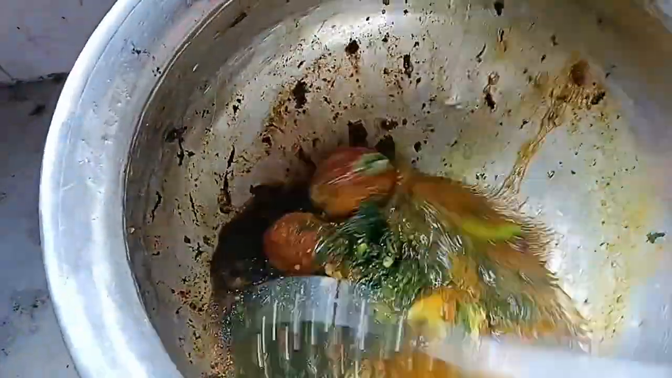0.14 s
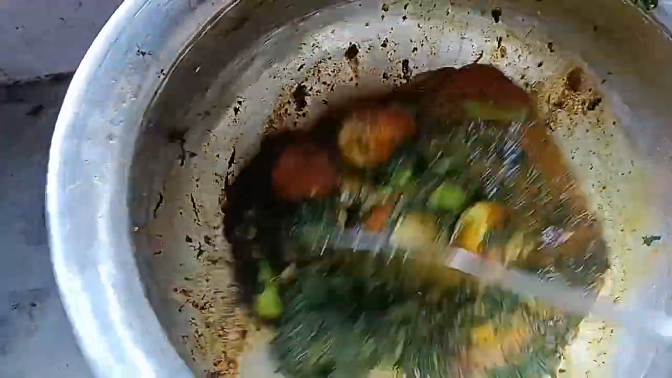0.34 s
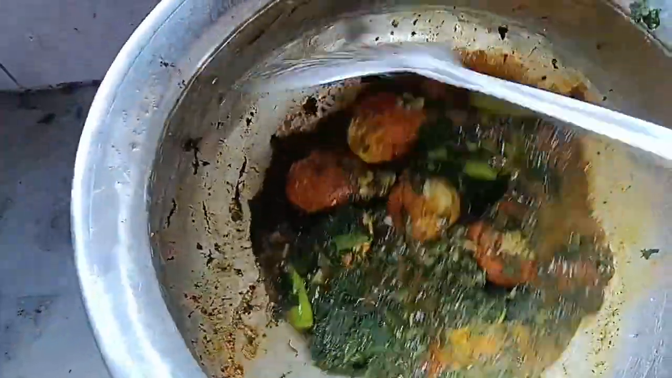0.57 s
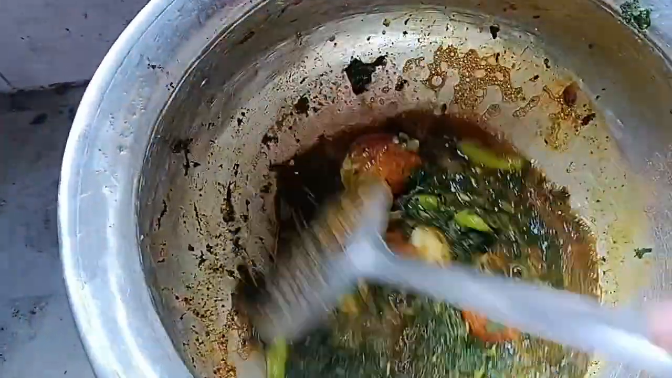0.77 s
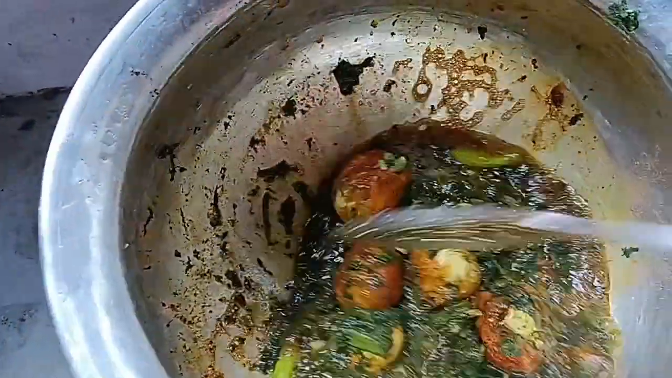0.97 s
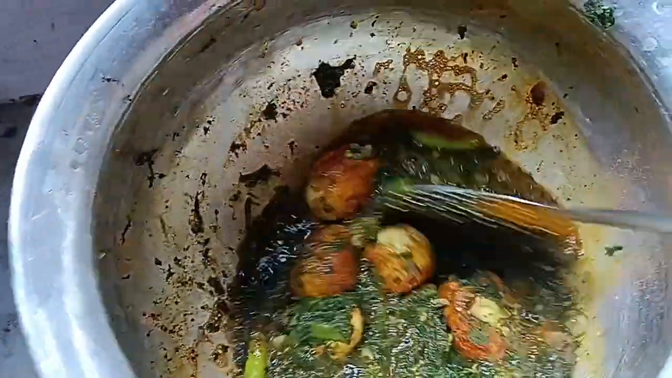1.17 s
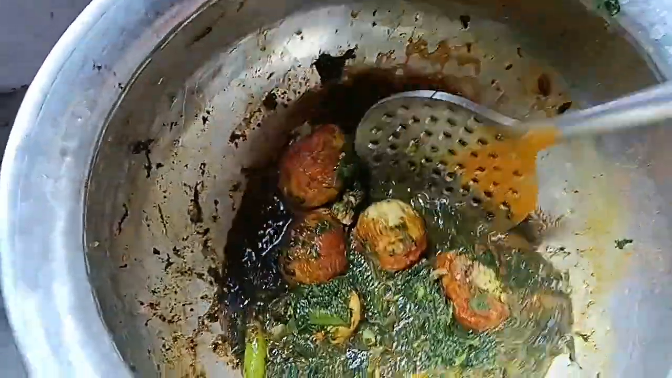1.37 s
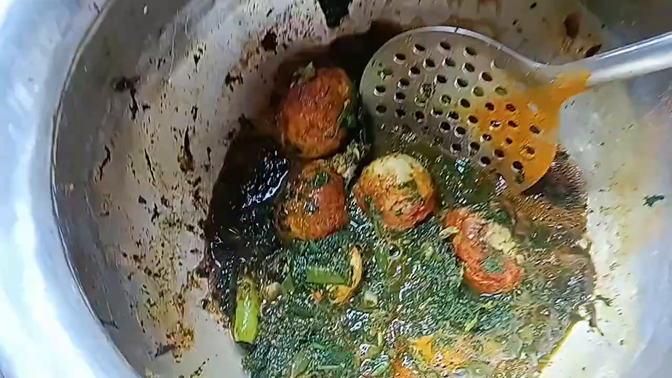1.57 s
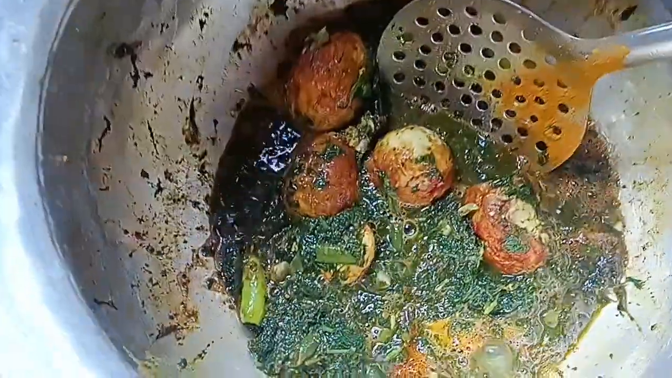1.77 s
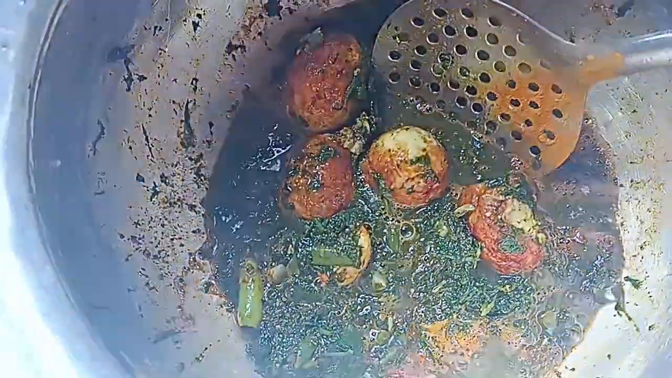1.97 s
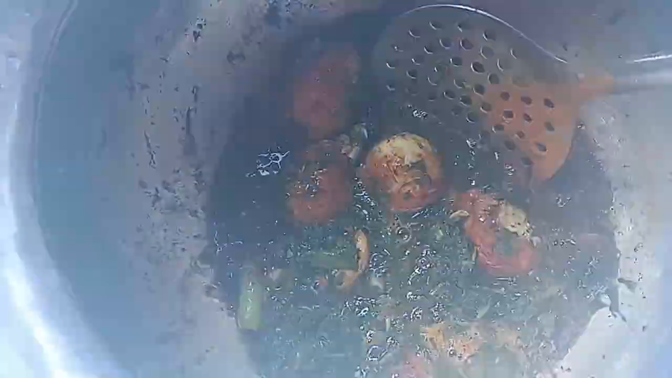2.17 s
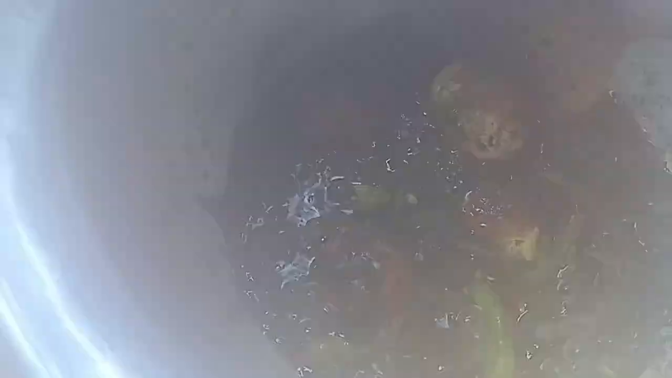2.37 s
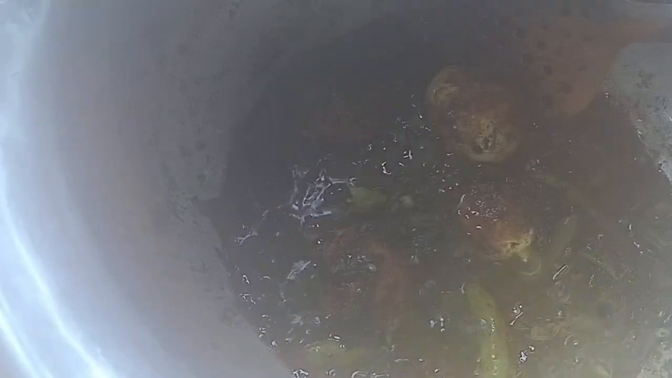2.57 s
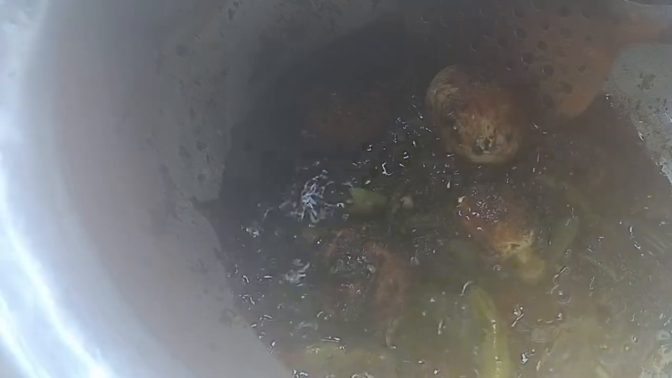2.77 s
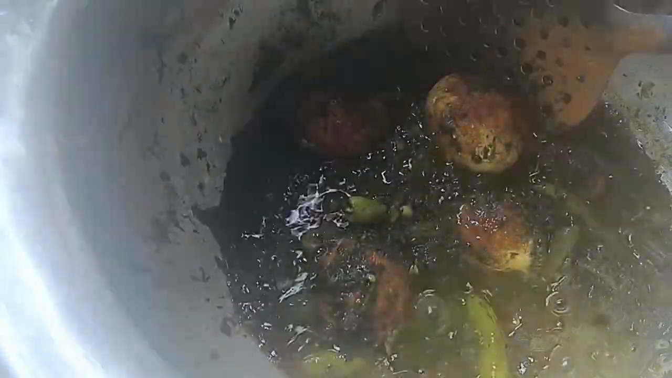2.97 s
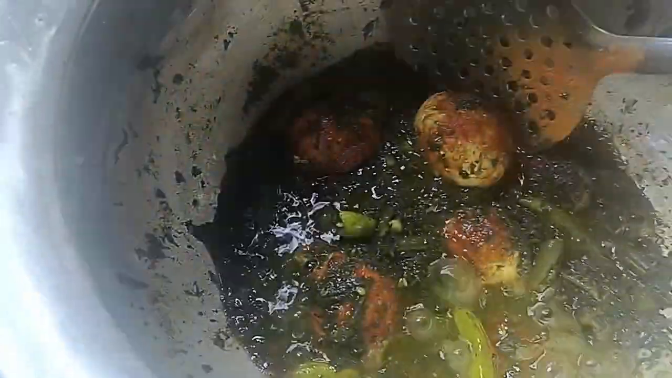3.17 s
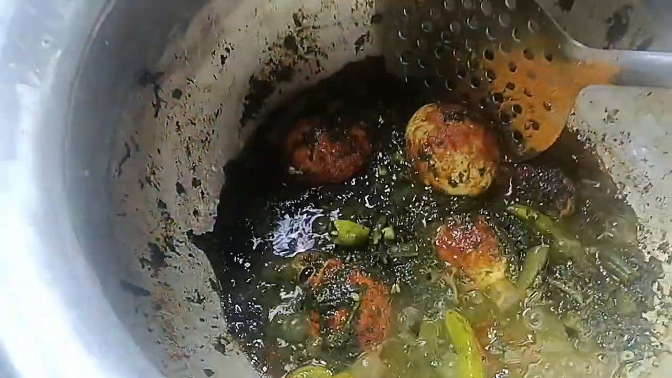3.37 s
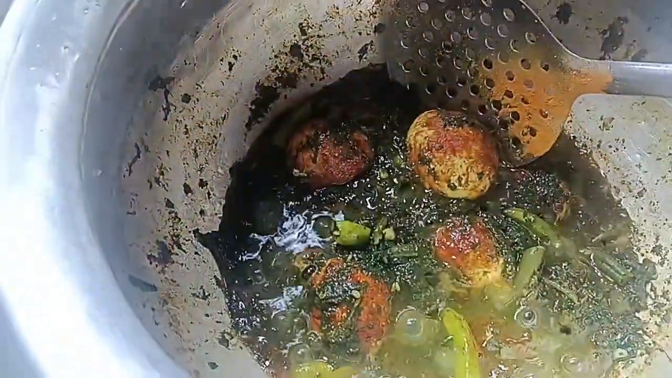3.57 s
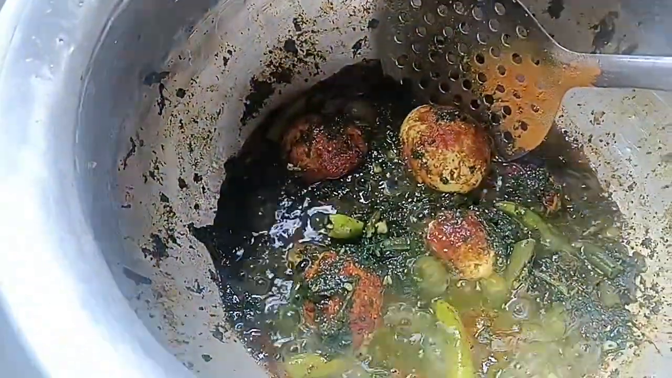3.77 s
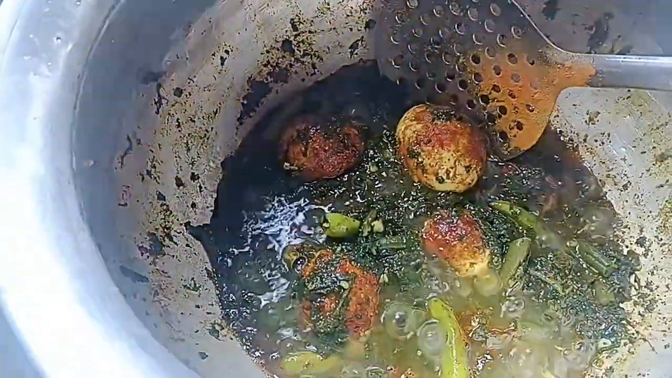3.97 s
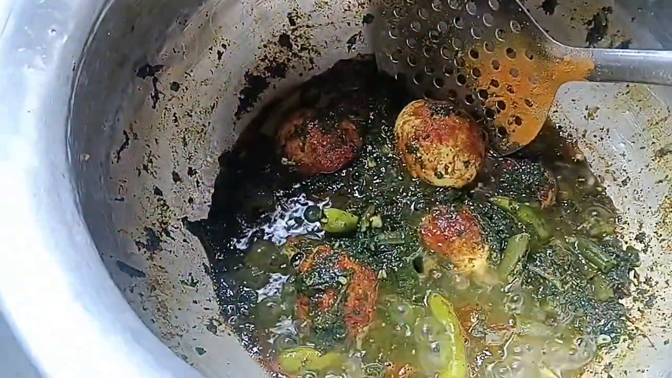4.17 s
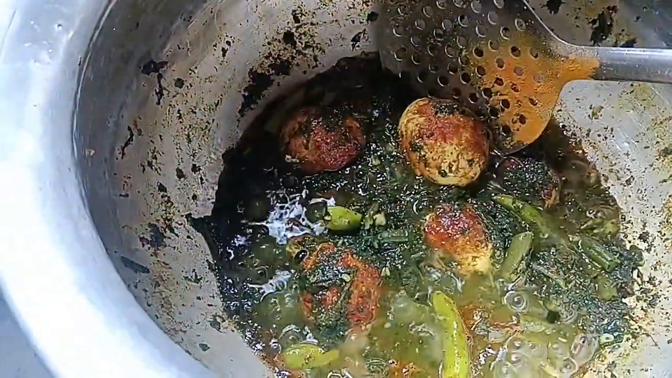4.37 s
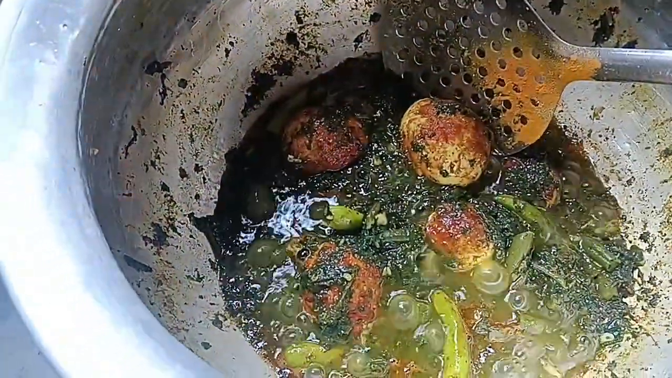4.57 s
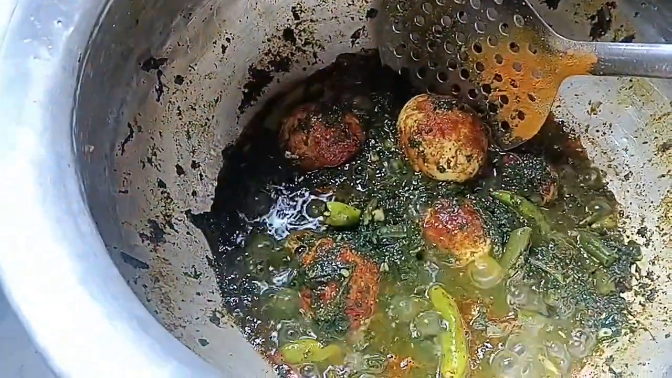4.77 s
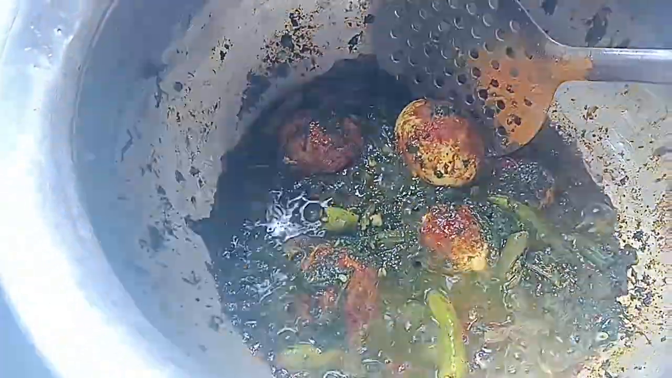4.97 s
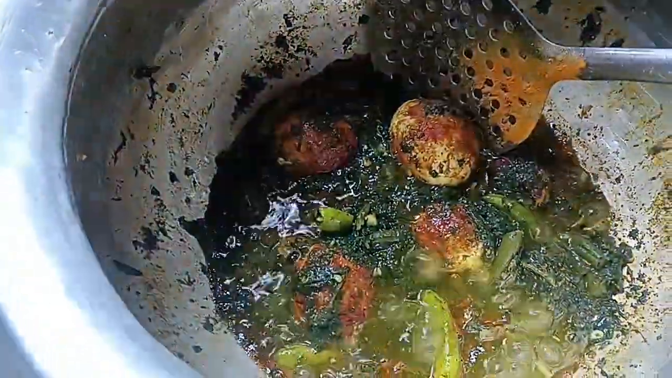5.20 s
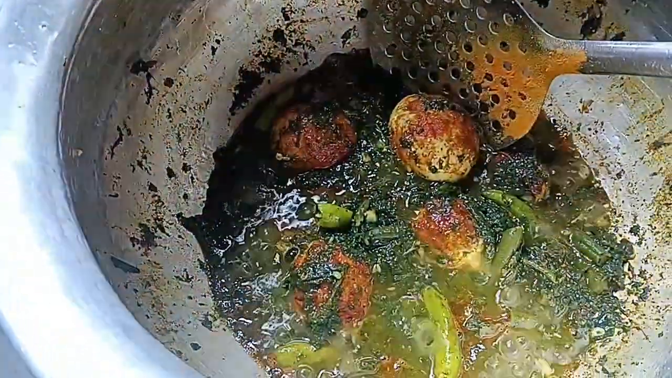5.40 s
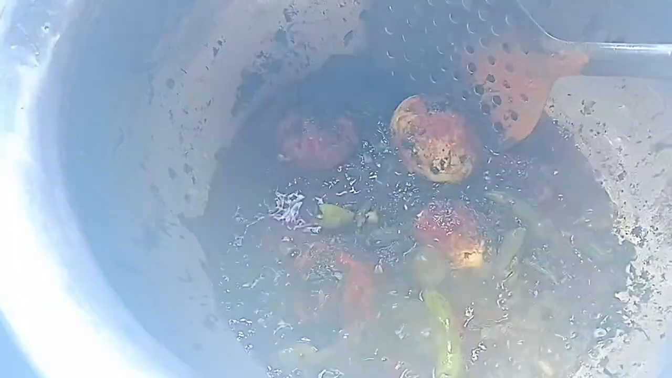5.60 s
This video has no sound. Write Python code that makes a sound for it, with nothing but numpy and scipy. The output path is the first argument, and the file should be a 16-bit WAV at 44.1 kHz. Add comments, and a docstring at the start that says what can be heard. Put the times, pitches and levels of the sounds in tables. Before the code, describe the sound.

Close up in a kitchen, a slotted steel spoon knocks a wide aluminium pot, with a few uneven clanks in the first second and a half, while greens and eggs sizzle softly. Frying and spits grow, the sound cuts to silence for a tenth of a second, then thin gravy boils strongly with hiss, plops and tiny steam squeaks, settling slightly to a steady boil.

```python
"""In a kitchen, a slotted steel spoon knocks around a wide aluminium pot of greens and eggs and is laid on its wall.
Blows are decaying modes of pot, spoon and enclosed air, with shaped noise for the crowded upper modes.
The food fries and spits; after a cut and a short muted gap, thin gravy boils strongly and settles.
Bubbles and sizzle are showers of damped sines, with hiss; bursts and spits excite the pot's air resonances.
Steam squeaks are gliding tones; low filtered noise is the burner's rumble."""
import sys
import numpy as np
from scipy import signal
from scipy.fft import rfft, irfft, next_fast_len
from scipy.io import wavfile
from scipy.ndimage import map_coordinates

SR = 44100
rng = np.random.default_rng(int(sys.argv[2]) if len(sys.argv) > 2 else 0)


def master(y):
    """Save y as 16-bit WAV."""
    cut = np.clip(np.atleast_2d(y).T, -1, 1)
    pcm = np.round(cut * 32767)  # scale
    wavfile.write(sys.argv[1], SR, pcm.astype(np.int16))


N = 248724

# resonances of the air in the pot: f/Hz, relative level/dB, t60/s
HOLLOW = [(363.6, -8, 0.15), (401.5, 0, 0.083), (442.5, -11, 0.15), (591.8, -9, 0.11), (981.8, -3.5, 0.12),
          (1008.4, -2, 0.067), (1526, -10.5, 0.14), (1829, -14.5, 0.11), (2690, -22, 0.12)]
BOIL_START_S, SETTLE_S = 2.46, 0.61  # cut to the strongly boiling gravy; time constant of its settling


def spoon_blows():
    """Modal excitation: the place of a blow sets how strongly each pot mode rings; spoon and air answer too."""
    # modes of the pot's metal: f/Hz, t60/s, then relative level/dB when struck on the side, base, wall, rim
    pot_modes = [(225, 1.1, -46, -54, -39, -49), (456, 0.6, -48, -43, -40, -54),
                 (495, 0.4, -56, -61, -35, -59), (689, 0.3, -64, -50, -35, -40),
                 (1022, 0.3, -54, -39, -35, -41), (1200, 1.5, -79, -63, -58, -47),
                 (1287, 0.9, -47, -57, -44, -56), (1384, 1.0, -63, -76, -41, -52),
                 (1522, 0.5, -56, -49, -26, -34), (1609, 0.42, -52, -41, -30, -25),
                 (1663, 0.85, -50, -42, -39, -41), (1711, 0.85, -63, -62, -41, -35),
                 (1729, 0.9, -71, -51, -42, -39), (1906, 0.7, -52, -81, -56, -69),
                 (2157, 0.9, -68, -67, -64, -41), (2239, 0.5, -45, -50, -40, -42),
                 (2317, 0.6, -50, -66, -52, -32), (2331, 0.7, -38, -55, -48, -39),
                 (2444, 0.5, -44, -55, -46, -45), (2476, 0.45, -45, -51, -51, -34),
                 (2530, 0.6, -39, -60, -52, -46), (2657, 0.35, -51, -53, -54, -38),
                 (3149, 0.43, -53, -54, -51, -37), (3400, 0.28, -56, -44, -41, -31),
                 (3521, 0.3, -62, -47, -36, -31), (3732, 0.25, -62, -55, -46, -25),
                 (3806, 0.33, -74, -54, -41, -30), (3880, 0.33, -64, -51, -45, -30),
                 (4070, 0.25, -74, -57, -42, -35), (4215, 0.27, -65, -50, -54, -31)]
    # places struck, in the order of those level columns
    places = ["side", "base", "wall", "rim"]
    # modes of the hand-damped spoon: f/Hz, relative level/dB, t60/s
    spoon_modes = [(2590, 8, 0.068), (2870, -8, 0.092), (3240, 13.5, 0.04), (3760, -4.5, 0.071),
                   (4350, -9.5, 0.065), (4780, 6, 0.044), (5390, -2, 0.04), (5860, 2, 0.11),
                   (7050, -22, .06), (7430, 2.5, 0.092)]
    # spoon on pot: t/s, place, relative level/dB of pot ring, spoon, hollow thud, sharp crack, clash,
    # then the clash's bass boost/dB and tilt/(dB per octave)
    blows = [(0.000, "side", 0, -66, -52, -27, -45.5, -2, -1.5),
             (0.2247, "side", -22.5, -66, -66, 8, -49.5, -28, -1),
             (0.231, "side", -22.5, -49.5, -49, 15.5, -44, -15, 0),
             (0.24, "base", -14.5, -64, -49, 13, -44.5, -13, 2.5),
             (0.268, "base", -30, -73, -51.5, 10, -53.5, 9, 0),
             (0.7204, "base", -6.5, -39.5, -48, 15, -36, -7, 6),
             (0.7275, "rim", -12.5, -36.5, -55, 3, -42.5, -19.5, 2),
             (0.783, "base", -5.5, -34, -25.5, -1.5, -22, 5, 2.5),
             (0.797, "base", -10.5, -39.5, -23.5, -1, -42.5, 5.5, 1),
             (1.2011, "wall", 0.5, -34, -31.5, 12.5, -18, -2.5, 1),
             (1.4905, "rim", -0.5, -33.5, -57, 5, -17.5, -27.5, -1)]
    out = np.zeros(N)
    for s, place, pot_db, spoon_db, thud_db, crack_db, clash_db, bass_db, tilt_db in blows:
        column = places.index(place)
        pot = [(hz, levels[column], t60) for hz, t60, *levels in pot_modes]
        # an out-of-round pot splits each mode into a beating pair
        twins = [(hz + 12 * rng.standard_normal(), db - 6.5, t60) for hz, db, t60 in pot]
        add(out, s, amp(pot_db) * ring(pot + twins, scatter_db=-0.7))
        add(out, s, amp(spoon_db) * ring(spoon_modes, scatter_db=3.5, size=SR // 4))
        add(out, s, amp(thud_db) * ring(HOLLOW[:3], scatter_db=-6.0, size=SR // 2))
        add(out, s, amp(clash_db + 2.5) * clash(bass_db, tilt_db, crack_db, crack_t60=0.026))
    return out


def clash(bass_db, tilt_db, crack_db, crack_t60):
    """High modal density: the crowded upper modes of both metals crack, then linger as a wash in pot and kitchen."""
    # spectrum of the clash: f/Hz, relative level/dB
    clash_colour = [(40, -22.5), (150, -7.5), (480, -1.5), (630, -0.5), (800, 4.5), (1250, -4), (1650, 5),
                    (1950, 2), (2400, 2), (2850, -4), (3300, 6), (4600, -3), (5050, -7), (7300, -3.5),
                    (9000, -1.5), (16000, -9)]
    # decay of the wash: f/Hz, t60/s
    clash_decay = [(150, 0.75), (1000, 0.34), (3500, 0.26), (7000, 0.24), (14000, 0.17)]
    # steel striking aluminium: f/Hz, relative level/dB
    contact = [(150, 0), (400, 3.5), (900, 1), (2000, -10), (4200, 0), (6500, -2.5), (12000, -20)]
    tilt_pivot_hz, bass_below_hz = 3570, 727

    # the modes bunch unevenly along frequency
    clusters = np.clip(wobble(226.4, size=SR // 2 + 1), -1.5, 1.5)
    modes = unit(irfft(rfft(rng.standard_normal(SR)) * amp(2.8 * clusters), SR))
    hz, t, bands = signal.stft(modes, SR, nperseg=256)
    lingering = fade(t, along(clash_decay, hz)[:, None])
    crack = amp(crack_db) * fade(t, crack_t60)
    wash = signal.istft(bands * (lingering + crack), SR, nperseg=256)[1][:SR]

    def response(f):
        """Contact stiffness: a harder contact tilts the clash upward; a square, heavy one adds bass."""
        bass = bass_db / (1 + (f / bass_below_hz) ** 6)
        tilt = tilt_db * np.log2(np.maximum(f, bass_below_hz) / tilt_pivot_hz)
        return amp(along(contact, f) + along(clash_colour, f) + bass + tilt)

    return filtered(wash, response) * (1 - np.exp(-np.arange(SR) / SR / 0.00017))


def bubbling():
    """Bubble resonance: bursts excite the air in the pot, and slower plops ring in the liquid."""
    # spectrum of the plops in the broth: f/Hz, relative level/(dB per Hz)
    broth = [(110, -33.5), (180, -16.5), (200, -16.5), (301, -13.5), (390, 1), (526, -14), (858, -16),
             (993, -8.5), (1190, -14.5), (1400, -35), (1820, -50.5), (3080, -120)]
    bursts = grains(count=2200, hz=2660, spread=0.46, cycles=1.5, range_db=3.5, size=64)
    hollow = unit(signal.fftconvolve(bursts, ring(HOLLOW, scatter_db=3.16, size=SR // 3))[:N])
    plops = grains(count=1800, hz=615.6, spread=0.594, cycles=9.8, range_db=-2.5, size=2000)
    bubbles = amp(-3.0) * hollow + amp(-3.0) * coloured(plops, broth)
    return amp(heat()[0]) * dulled(bubbles)


def dulled(bubbles):
    """Low-pass shelving: the settled boil has bigger, duller bubbles, with less of the upper ring."""
    loss_db, above_hz = -3.5, 705
    settled = 1 - np.exp(-np.maximum(np.arange(N) / SR - BOIL_START_S, 0) / SETTLE_S)
    big = filtered(bubbles, lambda hz: amp(loss_db / (1 + (above_hz / (hz + 1)) ** 8)))
    return bubbles + settled * (big - bubbles)


def sizzling():
    """Superposition of random impulses: foam crackles, pings and hisses in clusters of small bursts."""
    # spectrum of crackle and hiss: f/Hz, relative level/(dB per Hz)
    fizz = [(300, -49.5), (600, -8.5), (1000, -5), (1330, -16), (1670, -23), (1900, -14), (2700, -11.5),
            (3600, -15), (4400, -20.5), (7300, -21), (10000, -29.5), (12500, -36), (16000, -36.5)]
    crackle = grains(count=6000, hz=5310, spread=0.52, cycles=8.4, range_db=1.0, size=220)
    pings = grains(count=2200, hz=2399, spread=0.282, cycles=36, range_db=2.5, size=1500)
    hiss = rng.standard_normal(N)
    sizzle = coloured(between_walls(crackle, wet_db=-7.5, t60=0.06) + amp(3.5) * hiss, fizz)
    sizzle += amp(-5.0) * between_walls(pings, wet_db=3.0, t60=0.22)
    foam_db = 1.3 * wobble(15) + 1.8 * wobble(70)  # small bubbles burst in clusters
    return amp(heat()[1] + foam_db) * sizzle


def fat_ticks():
    """Impulsive excitation: sparse damped ticks of fat on the hot metal follow the sizzle at half its dB swing."""
    fat = grains(count=520, hz=6300, spread=0.17, cycles=9, range_db=6.5, size=200)
    return amp(-41 + .5 * heat()[1]) * between_walls(fat, wet_db=-3.0, t60=0.014)


def spits():
    """Excitation and resonance: a larger bubble snaps open as a noise burst and the pot's hollow answers."""
    # the loudest spits of fat and gravy: t/s, relative snap level/dB, snap f/Hz, relative hollow level/dB
    loud_spits = [(1.783, -54, 6600, -39), (2.112, -46, 6400, -36.5), (2.168, -44, 2940, -38.5),
                  (2.24, -45.5, 5750, -68), (2.266, -47, 2510, -37.5), (2.342, -38, 6800, -43),
                  (2.349, -35, 1940, -30), (2.617, -35.5, 3370, -65), (3.762, -35, 3100, -32),
                  (3.996, -39, 2740, -64), (4.356, -40, 2590, -38.5), (5.359, -60, 2770, -36)]
    out, t = np.zeros(N), np.arange(SR // 10) / SR
    life = fade(t, .016) + .12 * fade(t, .09)  # the snap and its weaker tail
    for s, db, hz, hollow_db in loud_spits + faint_spits(count=20):
        noise = rng.standard_normal(len(t))
        snap = unit(filtered(noise, lambda f: 1 / (1 + ((f - hz) / (0.21 * hz)) ** 2)))
        add(out, s, amp(db - 3.0) * snap * life)
        add(out, s, .5 * amp(hollow_db) * ring(HOLLOW, scatter_db=1.5, size=SR // 4))
    return out


def faint_spits(count):
    """Random arrivals: small spits at uniform random moments, scaled by the sizzle around them."""
    typical_hz, octaves = 3900, 1.56  # middle and full width of the pitch range
    snap_db, hollow_db = 5.5, -4  # relative to the sizzle, before the gains in spits()
    sizzle_db = heat()[1]
    rows = []
    for when, strong, high in rng.random((count, 3)):
        db = sizzle_db[int(when * N)] + 6 * (strong - .5)
        hz = typical_hz * 2 ** (octaves * (high - .5))
        rows.append((when * N / SR, db + snap_db, hz, db + hollow_db))
    return rows


def squeaks():
    """Frequency and amplitude modulation: steam slips through wet greens in sputtering, sagging whistles."""
    # the clearest squeaks: t/s, length/s, starting f/Hz, relative level/dB
    clear_squeaks = [(0.387, 0.18, 2650, -60.5), (.52, 0.076, 2030, -60.5), (1.848, 0.014, 2830, -47),
                     (2.011, 0.47, 3850, -62), (2.854, 0.091, 2695, -46.5), (3.136, 0.09, 2750, -45),
                     (3.21, 0.072, 2450, -49.5), (3.285, 0.046, 2094, -50), (3.883, 0.066, 1530, -52),
                     (4.19, 0.048, 2700, -48.5)]
    sag = 0.051  # share of its pitch that a squeak loses as the steam runs out
    out = np.zeros(N)
    for s, length, hz, db in clear_squeaks + faint_squeaks(count=16):
        size = int(length * SR)
        flutter = 1 + 0.033 * wobble(401, size=SR)[:size]
        pitch = hz * np.linspace(1, 1 - sag, size) * flutter
        sputter = unit(amp(3 * wobble(160, size=SR)[:size]))
        whistle = np.sin(2 * np.pi * np.cumsum(pitch) / SR)
        add(out, s, amp(db) * np.sqrt(np.hanning(size)) * sputter * whistle)
    return out


def faint_squeaks(count):
    """Random arrivals: small squeaks at uniform random moments of the boil, scattered in length and pitch."""
    typical_s, typical_hz, level_db = .018, 2450, -53
    rows = []
    for when, long, high in rng.random((count, 3)):
        s = BOIL_START_S + when * (N / SR - BOIL_START_S)
        length = typical_s * 2 ** (long - .5)
        rows.append((s, length, typical_hz * 2 ** (0.74 * (high - .5)), level_db))
    return rows


def burner_rumble():
    """Spectral shaping: Gaussian noise takes the burner's low-frequency spectrum."""
    # spectrum of the burner: f/Hz, relative level/(dB per Hz)
    burner_spectrum = [(25, -24.5), (44, -30.5), (57, -4.5), (64, -4), (71, -1), (100, -11.5), (116, -1.5),
                       (128, -1.5), (158, 1.5), (182, -20.5), (400, -22.5), (1200, -61)]
    return amp(heat()[2]) * coloured(rng.standard_normal(N), burner_spectrum)


def heat():
    """Exponential relaxation: dB levels of bubbling, sizzle and burner in frying, then in a boil that settles."""
    # frying, where the food bubbles harder once the spoon is laid down: t/s, bubbling level/dB
    frying = [(0, -48), (.3, -61.5), (.55, -62.5), (1.15, -62.5), (1.8, -52), (1.98, -56), (2.3, -50.5)]
    fry_sizzle_db, sizzle_follows = -63.5, .55  # at average bubbling; dB of sizzle per dB of bubbling
    stir_db, stir_s = 9, 0.2  # the first stir turns wet food onto hot metal: extra sizzle, time constant
    fry_burner_db = -66.5
    boil_bubbling_db, boil_sizzle_db, boil_burner_db = -47, -55, -51  # levels the boil settles toward
    extra_bubbling_db, extra_sizzle_db, extra_burner_db = 3.5, 2.2, 3  # when the boil is first heard

    t = np.arange(N) / SR
    frying_db = np.interp(t, *np.transpose(frying))
    liveliness_db = frying_db - frying_db[t < BOIL_START_S].mean()
    sizzle_db = fry_sizzle_db + sizzle_follows * liveliness_db + stir_db * np.exp(-t / stir_s)
    settling = np.exp(-np.abs(t - BOIL_START_S) / SETTLE_S)
    boiling = t >= BOIL_START_S
    return (np.where(boiling, boil_bubbling_db + extra_bubbling_db * settling, frying_db),
            np.where(boiling, boil_sizzle_db + extra_sizzle_db * settling, sizzle_db),
            np.where(boiling, boil_burner_db + extra_burner_db * settling, fry_burner_db))


def between_walls(x, wet_db, t60):
    """Reverberation: small sounds bounce between the pot's walls, as convolution with decaying noise."""
    t = np.arange(SR // 8) / SR
    tail = rng.standard_normal(len(t)) * fade(t, t60) * (1 - np.exp(-t / 0.0029))
    echoes = signal.fftconvolve(x, tail / np.linalg.norm(tail))[:N]
    return (x + amp(wet_db) * echoes) / np.hypot(1, amp(wet_db))


def ring(modes, scatter_db, size=SR):
    """Modal superposition: decaying (f/Hz, level/dB, t60/s) modes, each at a random strength and phase."""
    t = np.arange(size) / SR
    chance = rng.standard_normal((len(modes), 2))
    tones = np.zeros(size)
    for (hz, db, t60), (strength, phase) in zip(modes, chance):
        tones += amp(db + scatter_db * strength) * fade(t, t60) * np.sin(2 * np.pi * (hz * t + phase))
    return tones * (1 - np.exp(-t / 0.00021))


def grains(count, hz, spread, cycles, range_db, size):
    """Shot noise: randomly timed damped sines (60 dB in the given cycles) of scattered pitch and size, at rms 1."""
    start = rng.integers(0, N, (count, 1))
    pitch = np.minimum(hz * np.exp(spread * rng.standard_normal((count, 1))), SR / 2)
    strength = amp(range_db * np.minimum(rng.exponential(size=(count, 1)), np.pi))
    turns = pitch * np.arange(size) / SR
    swell = 1 - np.exp(-(20 * turns / cycles) ** 2)  # a soft start keeps each grain near its pitch
    waves = strength * swell * fade(turns, cycles) * np.sin(2 * np.pi * turns)
    return unit(np.bincount((start + np.arange(size)).ravel(), waves.ravel(), N)[:N])


def amp(db):
    """Logarithmic level: decibels to amplitude gain."""
    return 10 ** (np.asarray(db) / 20)


def unit(x):
    """Normalisation: scale to rms 1."""
    return x / np.sqrt(np.mean(x ** 2) + 1e-20)


def along(points, hz):
    """Logarithmic interpolation: (f/Hz, value) points read on a log-frequency axis."""
    f, v = np.transpose(points)
    return np.interp(np.log(hz + 1), np.log(f + 1), v)


def fade(t, t60):
    """Exponential decay: a fall of 60 dB in t60."""
    return np.exp(-np.log(1000) * t / t60)


def wobble(rate, size=N):
    """Spline interpolation: a smooth random curve with rate knots in every SR points."""
    knots = rng.standard_normal(int(size * rate / SR) + 4)
    return map_coordinates(knots, [np.arange(size) * rate / SR])


def filtered(x, response):
    """Linear filtering: the spectrum of x times a response of frequency."""
    m = next_fast_len(len(x) + 8192)
    return irfft(rfft(x, m) * response(np.fft.rfftfreq(m, 1 / SR)), m)[:len(x)]


def coloured(x, spectrum):
    """Spectral shaping: x filtered by an (f/Hz, level/dB) curve, at rms 1."""
    return unit(filtered(x, lambda hz: amp(along(spectrum, hz))))


def add(track, s, sound):
    """Superposition: mix a sound into the track at time s."""
    part = track[max(round(s * SR), 0):][:len(sound)]
    part += sound[:len(part)]


def scene():
    """Superposition of all sources; thin metal radiates little bass, so the blows are high-passed."""
    highpass = signal.butter(2, 120, "high", fs=SR, output="sos")
    blows = signal.sosfilt(highpass, spoon_blows())
    cooking = bubbling() + sizzling() + fat_ticks() + burner_rumble()
    steam = between_walls(squeaks(), wet_db=-4, t60=0.18)
    return (blows + cooking + amp(-2.5) * spits() + steam)[None]


def record(dry):
    """Gating and band limiting: the sound is muted around the cut and fades back in; the top treble is removed."""
    # the short muted gap: t/s, linear gain
    muted_gap = [(0, 1), (2.356, 1), (2.358, 0), (2.465, 0), (2.469, .17), (2.53, .5), (2.66, 1), (6, 1)]
    top_hz = 15950  # middle of a 500 Hz wide slope
    gain = np.interp(np.arange(N) / SR, *np.transpose(muted_gap))
    band = lambda hz: np.clip((top_hz - hz) / 500 + .5, 0, 1)
    return filtered(dry[0] * gain, band)[None]


dry = scene()
out = record(dry)
master(out)
```